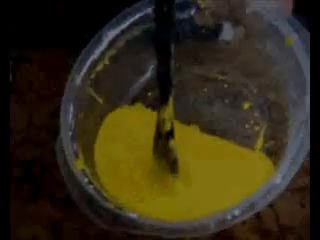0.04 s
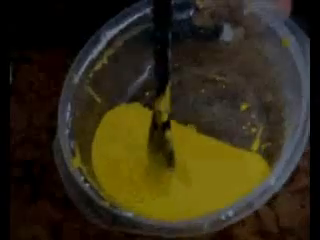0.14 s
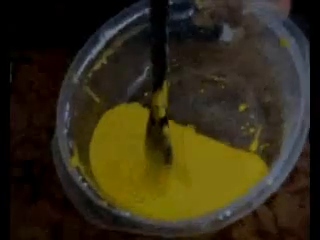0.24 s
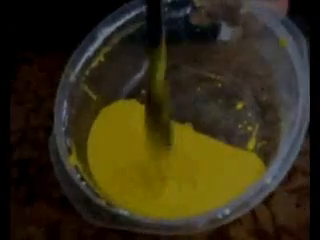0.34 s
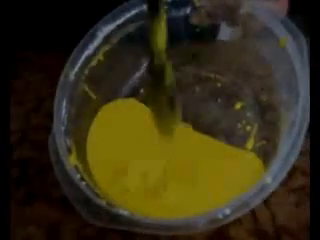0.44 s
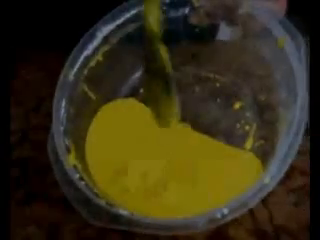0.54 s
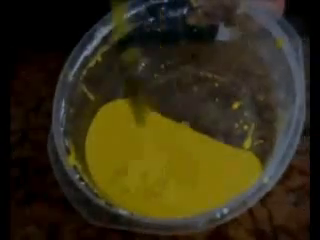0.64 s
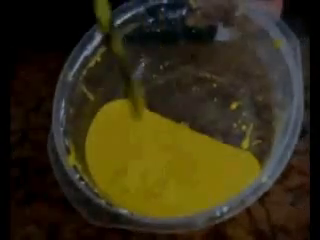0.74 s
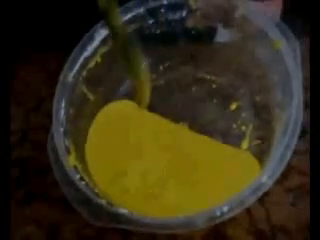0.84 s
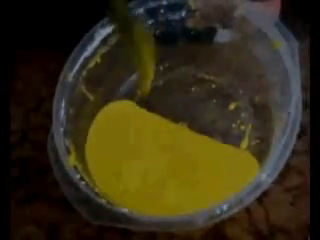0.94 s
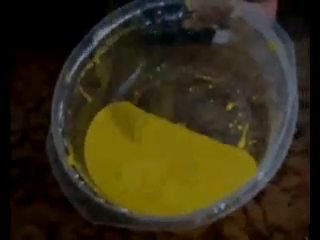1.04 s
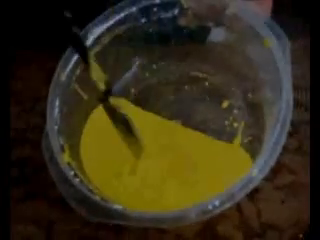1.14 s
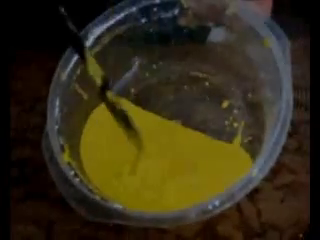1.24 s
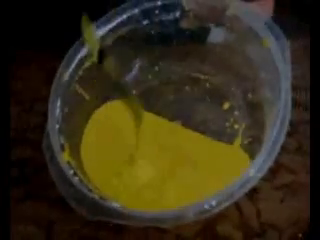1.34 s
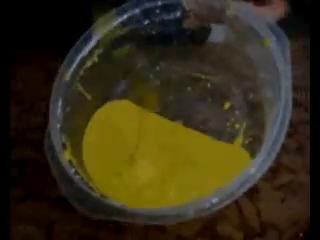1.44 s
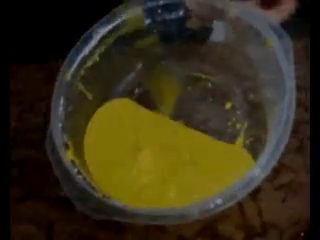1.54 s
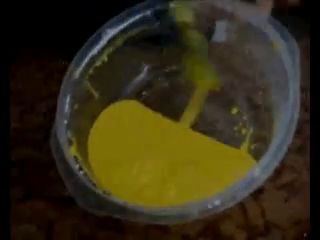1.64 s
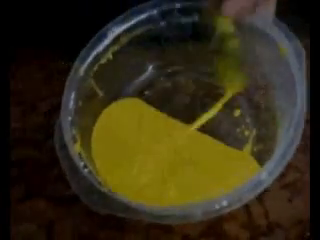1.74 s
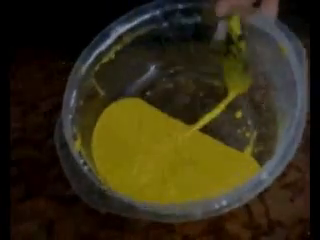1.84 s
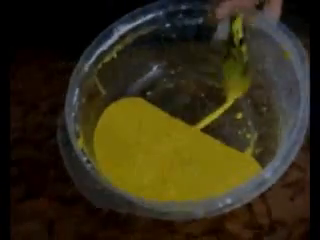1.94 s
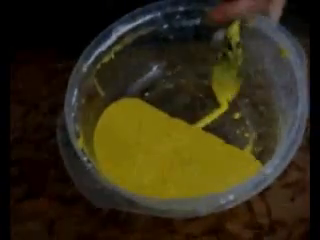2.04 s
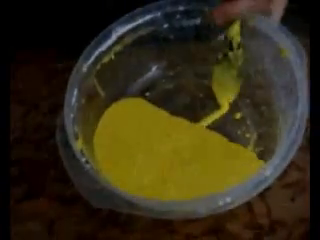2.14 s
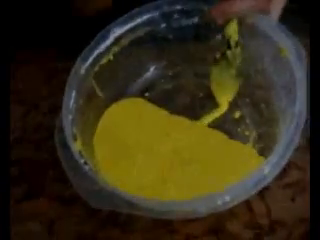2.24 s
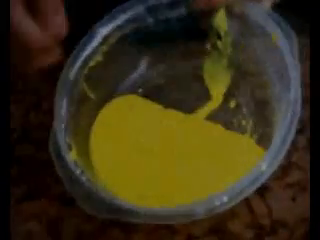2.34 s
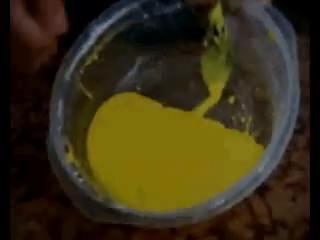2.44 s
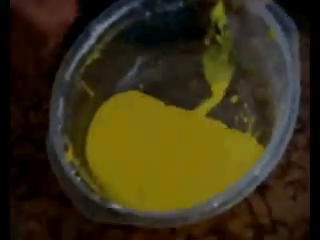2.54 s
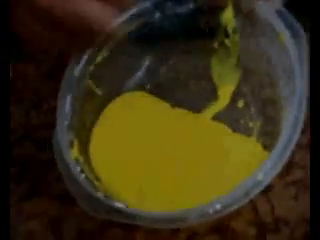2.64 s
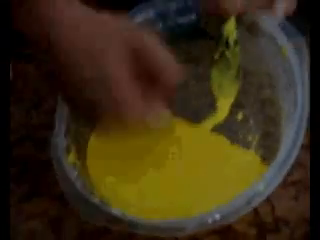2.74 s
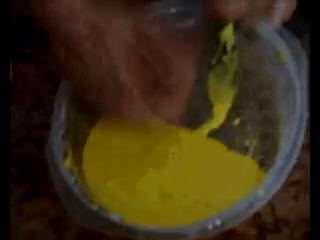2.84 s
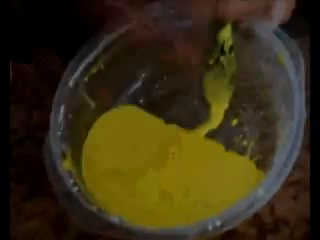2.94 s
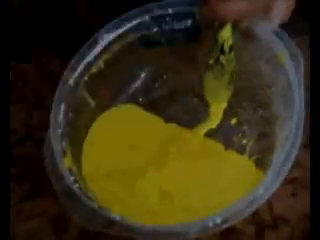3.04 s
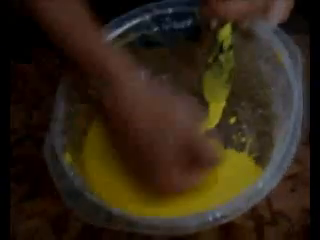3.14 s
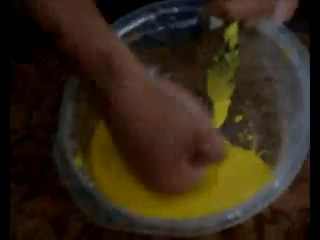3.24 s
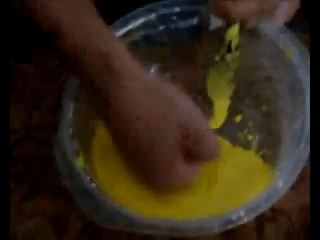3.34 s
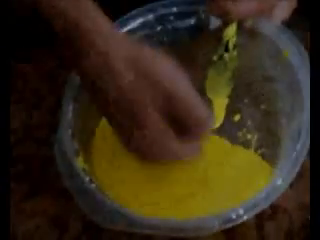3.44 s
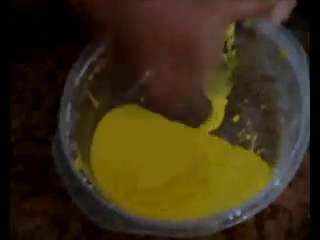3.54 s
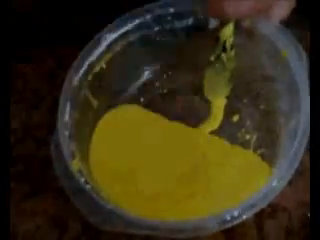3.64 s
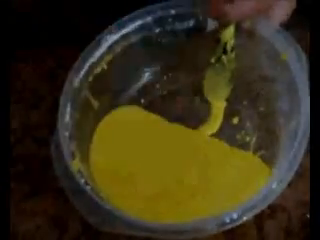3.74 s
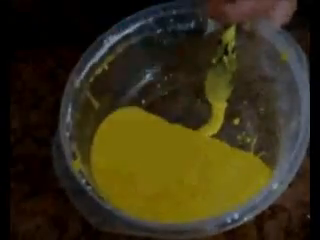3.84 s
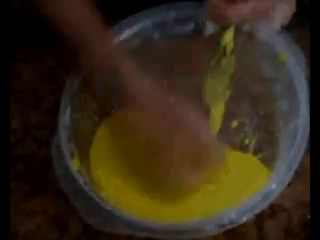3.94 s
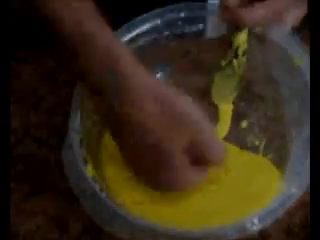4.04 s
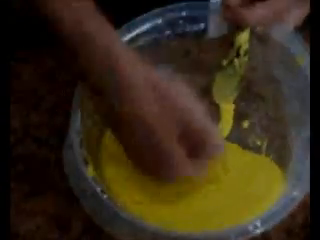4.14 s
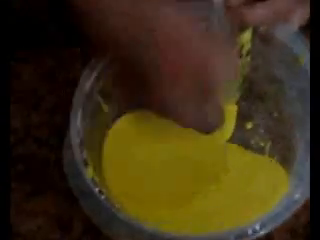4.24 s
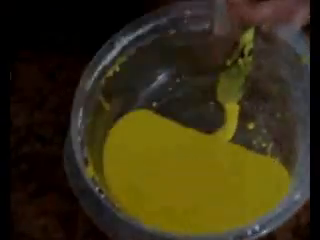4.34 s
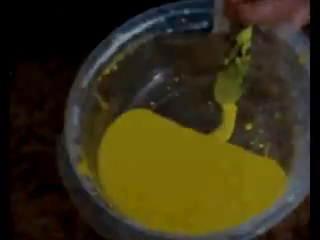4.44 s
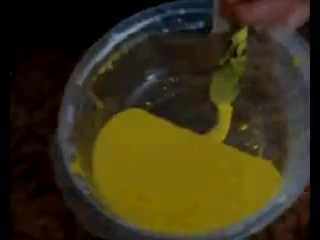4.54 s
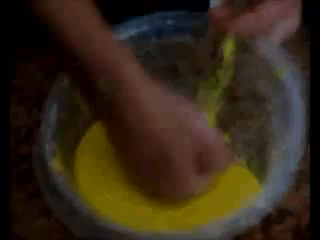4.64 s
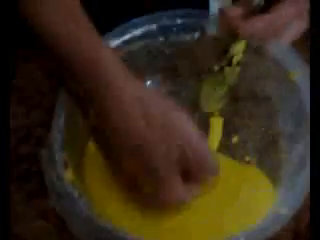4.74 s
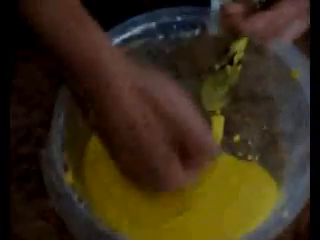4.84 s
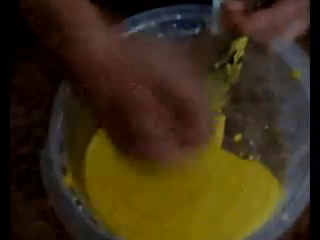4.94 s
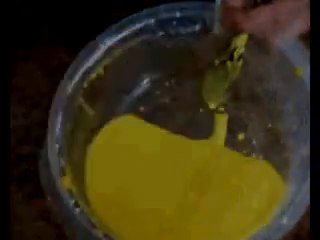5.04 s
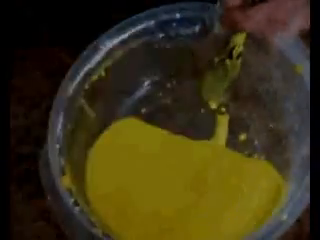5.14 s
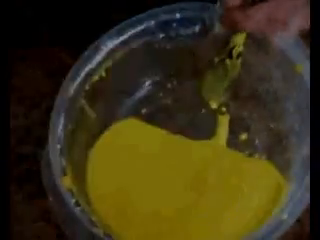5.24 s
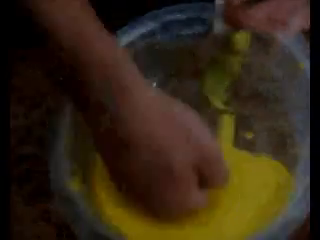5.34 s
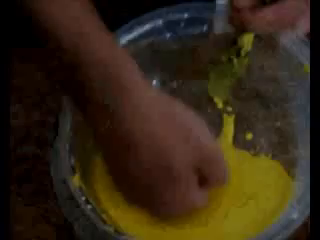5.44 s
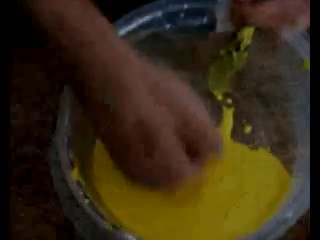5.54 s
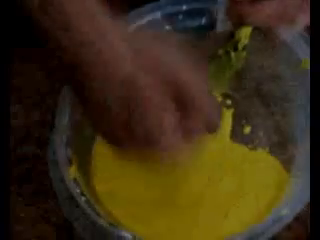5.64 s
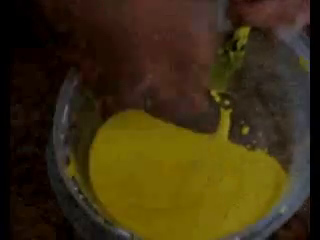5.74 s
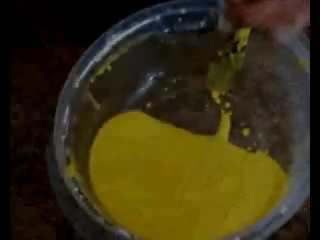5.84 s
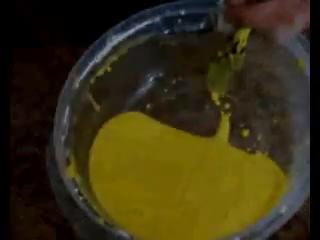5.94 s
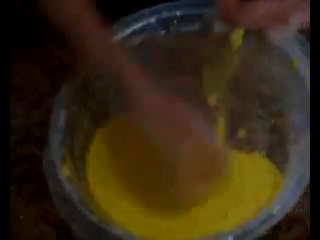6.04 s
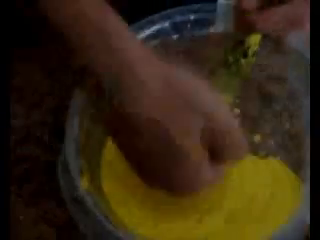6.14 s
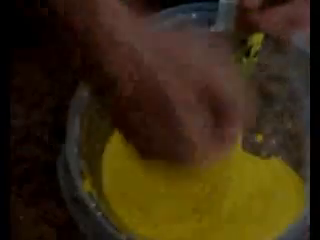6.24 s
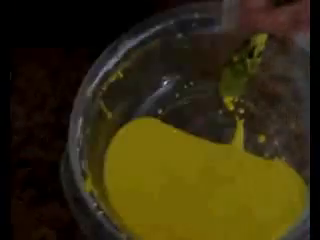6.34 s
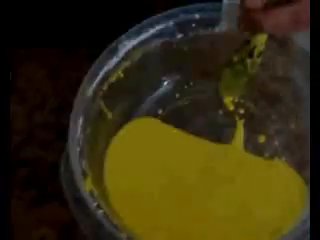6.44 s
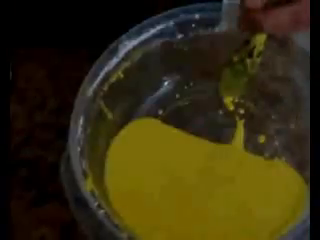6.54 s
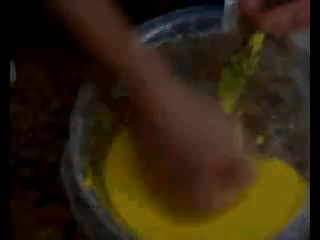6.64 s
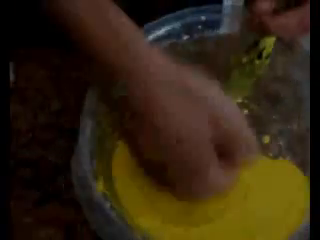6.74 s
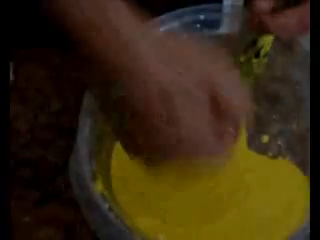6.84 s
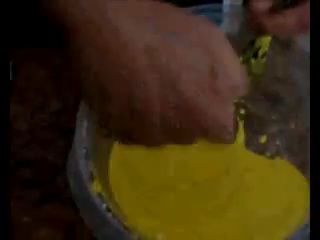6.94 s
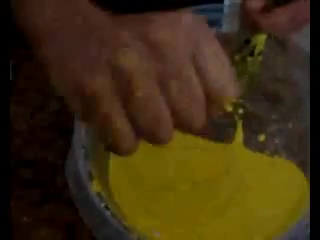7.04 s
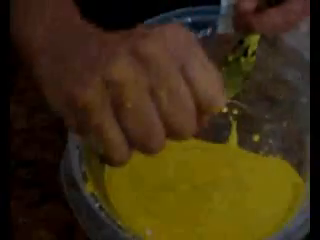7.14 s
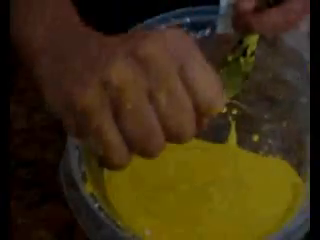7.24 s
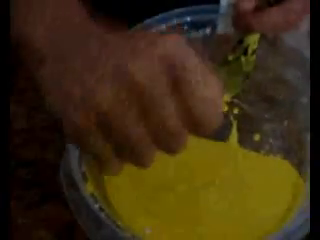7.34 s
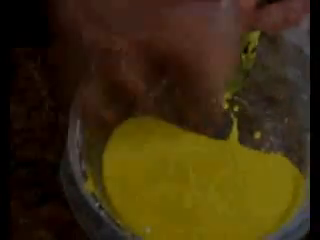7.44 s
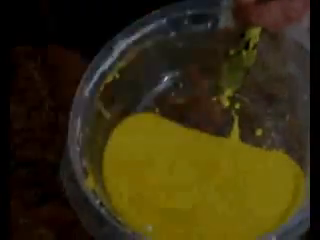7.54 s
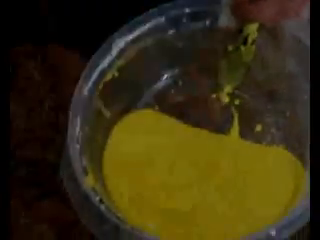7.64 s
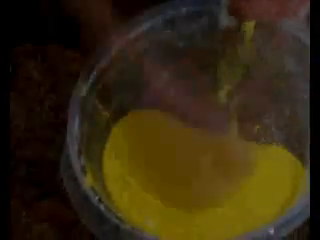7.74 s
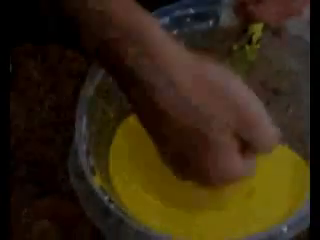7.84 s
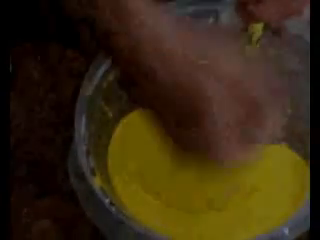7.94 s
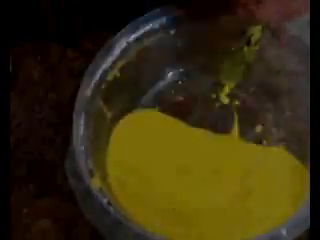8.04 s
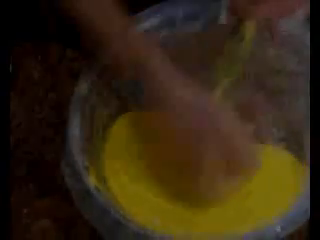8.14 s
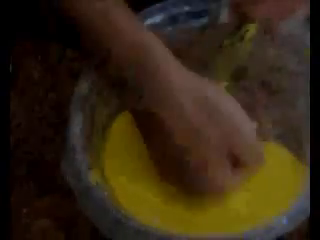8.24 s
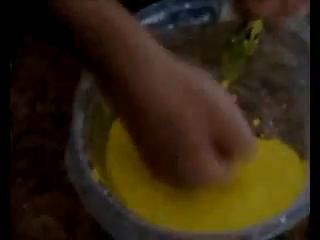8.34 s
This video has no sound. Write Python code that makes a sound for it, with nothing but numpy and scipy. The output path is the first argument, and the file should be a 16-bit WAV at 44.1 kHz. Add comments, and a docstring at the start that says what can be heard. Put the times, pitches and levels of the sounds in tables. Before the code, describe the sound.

Quiet spoon strokes and small clicks on plastic come first, over microphone hiss, low rumble and a faint high whine. Then eight loud punches land on paste that behaves like a solid: crisp slap, dull double knock, brief bowl shudder, low table sway. Metal pieces chatter brightly after each blow, dulling as they settle. Close microphone, small room with a very short faint tail.

```python
"""A spoon swishes, drags and taps in a plastic bowl of cornstarch paste; then a fist punches it eight times.
Heard from just above the bowl on its table, with a faint short tail from nearby walls.
The paste locks solid: each punch is a wet slap of noise, damped-sine knocks and a short judder of the bowl.
The table's low modes sway, and loose metal jangles as thousands of short pings and a few longer modes.
The microphone adds hiss and a thin whine of steady sines."""
import sys
import numpy as np
from scipy import signal
from scipy.fft import rfft, irfft
from scipy.io import wavfile

SR = 44100
rng = np.random.default_rng(int(sys.argv[2]) if len(sys.argv) > 2 else 0)


def inscribe(sig):
    """Save sig as 16-bit PCM at rate SR to the path in sys.argv[1].

    A 1-D sig is mono; a 2-D sig holds one channel per row.
    Samples are clipped to [-1, 1] before scaling.
    """
    pcm = np.round(np.clip(np.atleast_2d(sig).T, -1, 1) * 32767)
    wavfile.write(sys.argv[1], SR, pcm.astype(np.int16))


N = 370440
TIME = np.arange(N) / SR


def from_db(db):
    """Decibels to gain."""
    return 10 ** (np.asarray(db) / 20)


def rms_one(x):
    """Scale to rms 1."""
    return x / np.sqrt(np.mean(x ** 2) + 1e-20)


def add(track, s, sound):
    """Mix a sound into a track at a time in seconds."""
    at = max(round(s * SR), 0)
    track[at:at + len(sound)] += sound[:max(N - at, 0)]


def at_hz(spectrum, hz):
    """Read a (pitch_hz, level_db) spectrum on a log-frequency axis."""
    points, db = np.transpose(spectrum)
    return np.interp(np.log(hz), np.log(points), db)


def coloured(x, spectrum, size=8192):
    """Causal (minimum-phase) filter of unit energy with the given spectrum."""
    grid = np.maximum(np.arange(size // 2 + 1) * SR / size, 1)
    cepstrum = irfft(np.log(from_db(at_hz(spectrum, grid))))
    # fold the cepstrum onto positive times to get minimum phase
    cepstrum[1:size // 2] *= 2
    cepstrum[size // 2 + 1:] = 0
    response = irfft(np.exp(rfft(cepstrum)))
    return signal.fftconvolve(x, response / np.linalg.norm(response))[:N]


def ring(x, hz, t60):
    """A two-pole mode: a unit click sets a decaying sine of height 1 ringing."""
    radius = 10 ** (-3 / (t60 * SR))
    angle = 2 * np.pi * hz / SR
    feedback = [1, -2 * radius * np.cos(angle), radius * radius]
    return signal.lfilter([0, np.sin(angle)], feedback, x + 1e-18)


def resonate(x, hz, t60):
    """A mode that passes white noise at unchanged rms."""
    return ring(x, hz, t60) * np.sqrt(4 * np.log(1000) / (t60 * SR))


def resonate_noise(envelope, hz, t60):
    """White noise shaped by an envelope drives one mode."""
    return resonate(envelope * rng.standard_normal(N), hz, t60)


def band(x, low_hz, high_hz):
    """Gentle band-pass."""
    edges = [low_hz, min(high_hz, SR / 2 - 1)]
    return signal.sosfilt(signal.butter(2, edges, "band", fs=SR, output="sos"), x)


def grains(per_s, spread_db):
    """Random tiny contacts of uneven size and either sign, rms 1."""
    sizes = from_db(spread_db * np.clip(rng.standard_normal(N), -2, 2))
    signs = rng.choice([-1, 1], N)
    return rms_one(sizes * signs * (rng.random(N) < per_s / SR))


def burst(decay_s, size=4096):
    """A puff of noise with exponential decay."""
    return rng.uniform(-1, 1, size) * np.exp(-TIME[:size] / decay_s)


def ping(hz, t60, size=8192):
    """One damped sine."""
    return np.sin(2 * np.pi * hz * TIME[:size]) * np.exp(-np.log(1000) * TIME[:size] / t60)


# Hiss and rumble at the microphone: pitch_hz, level_db (per Hz, relative)
HISS_COLOUR = [(20, -3.5), (55, -8), (75, -2.5), (110, -12.5), (220, -13), (480, -22), (900, -24),
               (2200, -26), (4500, -27.5), (7000, -31), (8500, -41), (9300, -49), (10000, -69)]
# Faint resonances behind the hiss: pitch_hz, level_db (rms), t60_s
HOLLOWS = [(25.9, -51, .4), (48.4, -55, 0.35), (650, -59.5, 0.01), (1920, -63.5, 0.043), (3360, -71, .03)]
# Thin steady whine: pitch_hz, level_db (rms)
WHINE = [(7014, -61.5), (7289, -68), (7359, -71), (8646, -85.5), (8710, -78), (8990, -78)]
HISS_DB = -46.5   # rms


def background():
    """Filtered noise makes rumble and hiss, narrow modes colour it, and steady sines make the electronic whine."""
    hiss = from_db(HISS_DB) * coloured(rng.standard_normal(N), HISS_COLOUR)
    hollow = sum(from_db(db) * resonate_noise(1, hz, t60) for hz, db, t60 in HOLLOWS)
    whine = sum(from_db(db) * np.sqrt(2) * np.sin(2 * np.pi * hz * TIME) for hz, db in WHINE)
    return hiss + hollow + whine


# Soft swishes, three spoon strokes and then the arm coming in: start_s, level_db
SWISHES = [(.16, -56.5), (.53, -56), (.87, -55), (2.7, -58)]
# Spoon dragging on the bowl: start_s, length_s, level_db
SCRAPES = [(.55, .3, -59), (.85, .48, -56), (1.41, .12, -54), (1.55, .09, -48), (1.68, .13, -53)]
# What the dragged spoon sounds: pitch_hz, level_db (relative), t60_s
SCRAPE_MODES = [(640, -8, 0.033), (1310, -18, 0.0055), (2000, -6, 0.013), (2730, -12, 0.0067),
                (3510, -2.5, 0.016)]
SWISH_S, SWISH_START_HZ, SWISH_END_HZ = .33, 5700, 3400


def spoon(swish_width_hz=580):
    """Swishes are a falling tone roughened by noise; drags are grains of contact ringing a few modes."""
    swishes, drag = np.zeros((2, N))
    stroke = np.clip(TIME[:SR] / SWISH_S, 0, 1)
    glide_hz = SWISH_START_HZ + (SWISH_END_HZ - SWISH_START_HZ) * stroke
    glide = np.sin(2 * np.pi * np.cumsum(glide_hz) / SR)
    swell = np.sin(np.pi * stroke)
    for s, db in SWISHES:
        friction = rms_one(band(rng.standard_normal(SR), low_hz=10, high_hz=swish_width_hz))
        add(swishes, s, from_db(db) * np.sqrt(2) * swell * glide * friction)
    for s, length, db in SCRAPES:
        add(drag, s, from_db(db) * np.sin(np.pi * np.clip(TIME[:SR] / length, 0, 1)))
    drag *= grains(per_s=2500, spread_db=3)
    return swishes + sum(from_db(db) * resonate(drag, hz, t60) for hz, db, t60 in SCRAPE_MODES)


# Small taps of spoon and fingers on the bowl: start_s, level_db (relative), pitch_hz, ring_cycles (to -60 dB)
TAPS = [(.385, -23, 5460, 5), (1.44, -12.5, 2780, 16), (1.460, -26, 2700, 11), (1.598, -25, 637, 43),
        (1.600, -18, 3000, 3), (1.844, -16.5, 4300, 4.2), (1.880, -17, 210, 4.3), (1.881, -22, 650, 8.6),
        (1.927, -25, 180, 4), (4.595, -3.5, 2620, 3.7), (5.127, -9, 5000, 6), (5.158, -17, 3740, 30),
        (5.932, -12, 4750, 22), (6.021, -14.5, 3540, 34)]


def taps():
    """Each light tap is a damped sine and a puff of noise around its pitch."""
    out = np.zeros(N)
    for s, db, hz, cycles in TAPS:
        add(out, s, from_db(db - 7.5) * ping(hz, t60=cycles / hz))
        puff = band(burst(decay_s=0.0043), low_hz=hz * 0.27, high_hz=hz * 1.42)
        add(out, s, from_db(db - 11.0) * puff)
    return out


# Fist meets paste, also played by bowl() and table() below; levels are relative within each layer:
# start_s, slap_db, knock_db, judder_db, judder_pitch_hz, judder_length_s, thud_db, table_sway_db
PUNCHES = [(3.1875, -6, -7.5, -25, 530, 0.13, -26.5, -15),
           (3.9551, -1, -11, -19.5, 506, 0.088, -23.5, -13.5),
           (4.6621, -6, -6.5, -18, 635, 0.086, -23.5, -15), (5.356, -8.5, -8, -22.5, 340, 0.08, -27, -13),
           (6.0903, -3, -6, -21.5, 496, 0.061, -25, -13.5),
           (6.678, -1, -8.5, -23, 413, 0.0944, -28.5, -16.5),
           (7.773, -0.5, -9, -21.5, 511, 0.096, -34, -14.5), (8.2245, -1, -7.5, -21, 545, 0.11, -39, -21.5)]


def slaps():
    """Skin meets the wet surface and squeezes out the air in a few milliseconds."""
    out = np.zeros(N)
    onset = np.clip(TIME[:4096] / 0.002, 0, 1)
    for s, db, *_ in PUNCHES:
        add(out, s, from_db(db + 5.5) * burst(decay_s=0.0025) * onset)
    return band(out, low_hz=2660, high_hz=6300)


# A low push and two knocks per punch, through the locked paste and as the bowl hits the table:
# delay_s, level_db, pitch_hz, crack_db (both levels added to the punch's knock_db)
LANDING = [(.0008, -8.5, 67, -19), (.0022, -2, 402, -5.5), (.0055, -1, 510, -7.5)]
# The bowl rebounds and knocks on the table again: start_s, level_db, pitch_hz, crack_db (levels relative)
REBOUNDS = [(3.2215, -11, 650, -20), (3.279, -7.5, 920, -4.5), (3.973, -7, 654, -9.5),
            (4.0487, -10.5, 841, -7), (6.1115, -11.5, 636, -18), (6.187, -9.5, 680, -13),
            (6.7001, -6, 485, -14.5), (7.7938, 1, 483, -17), (8.2477, -4, 604, -8)]
# Rough colour of the judder: pitch_hz, level_db (per Hz, relative)
JUDDER_COLOUR = [(100, -21), (250, 5), (650, -11), (900, -4.5), (1200, -3), (1600, -10.5), (3000, -12.5),
                 (5600, -18), (8000, -24.5), (9500, -56)]
# The loaded bowl: pitch_hz, level_db (relative), t60_s
BOWL_MODES = [(261, -1, 0.07), (306, -4.5, 0.064), (388.7, -1.5, 0.11), (487, -4, 0.05), (577, -5.5, .08),
              (650.4, -1.5, 0.07), (693, 1, 0.07)]
# The fist's push on the bowl
PRESS_ATTACK_S, PRESS_RELEASE_S, PRESS_SAG_DB_PER_S = 0.0013, .0054, 34.5


def bowl(focus_db=7):
    """Hard knocks, then a judder for as long as the fist drives the bowl against the table."""
    thumps, cracks, press, thud = np.zeros((4, N))
    landings = [(s + delay, knock_db + db, hz, knock_db + crack_db)
                for s, _, knock_db, *_ in PUNCHES for delay, db, hz, crack_db in LANDING]
    for s, db, hz, crack_db in landings + REBOUNDS:
        add(thumps, s, -from_db(db + 4.0) * ping(hz, t60=5.8 / hz))
        add(cracks, s, from_db(crack_db + 11) * burst(decay_s=.0025))
    pitch, age = np.full(N, 500.), TIME[:SR // 4]
    for s, _, _, db, hz, length, thud_db, _ in PUNCHES:
        attack = np.clip(age / PRESS_ATTACK_S, 0, 1)
        release = np.clip((length - age) / PRESS_RELEASE_S + .5, 0, 1)
        contact = from_db(-PRESS_SAG_DB_PER_S * age) * attack * release
        add(press, s, from_db(db) * contact)
        add(thud, s, from_db(thud_db) * contact)
        pitch[round(s * SR):] = hz
    judder = press * grains(per_s=3900, spread_db=4.5)
    wall = np.zeros(N)
    for hz, db, t60 in BOWL_MODES:
        # where the fist lands decides which modes speak most
        octaves_away = np.abs(np.log2(hz / pitch))
        wall += from_db(db - 2.5 - focus_db * octaves_away) * resonate_noise(press, hz, t60)
    thud_modes = [(73.0, 1, 0.036), (128.2, 4.5, 0.051), (207.0, -3.5, .05)]   # pitch_hz, level_db, t60_s
    weight = sum(from_db(db) * resonate_noise(thud, hz, t60) for hz, db, t60 in thud_modes)
    knocks = thumps + band(cracks, low_hz=920, high_hz=2870)
    return knocks + from_db(-6) * coloured(judder, JUDDER_COLOUR) + wall + weight


# The table under the bowl: pitch_hz, level_db (relative), t60_s
TABLE_MODES = [(26.66, -1, 1.63), (34.6, 0, 0.11), (54.4, -8.5, 1.1), (76.5, -8, 0.55), (131, -13.5, 1.1)]


def table():
    """Each punch is one impulse that leaves the table swaying in its lowest modes."""
    shoves = np.zeros(N)
    for s, *_, db in PUNCHES:
        add(shoves, s, from_db([db]))
    return sum(from_db(db) * ring(shoves, hz, t60) for hz, db, t60 in TABLE_MODES)


# Loose metal on the table after each punch, also played by clinks() below:
# first_stir_s, breaks_loose_s, strength_db (relative), hold_s, release_db_per_s
JANGLES = [(3.287, 3.318, -20, .11, 101), (4.035, 4.056, -18, 0.17, 92), (4.721, 4.762, -17.5, 0.23, 73),
           (5.408, 5.419, -18, 0.33, 57), (6.14, 6.152, -19, .24, 86), (6.723, 6.771, -19, 0.32, 102.5),
           (7.828, 7.871, -19, .15, 81), (8.282, 8.325, -19.5, .2, 80)]
# The lighter rattle before the pieces break loose; its level is relative to strength_db
STIR_DB, STIR_RISE_S, STIR_HARDNESS_DB = -6.5, 0.0027, 2
# Contacts start hard and soften as the sway dies
HARDNESS_DB, SOFTENING_DB_PER_S, SOFTEST_DB = 8, 44, -15


def shaking():
    """Gain and contact hardness (dB) of the metal: it stirs, breaks loose, holds while softening, dies away."""
    shake, hard_db = np.zeros((2, N))
    for stir_s, loose_s, db, hold_s, release in JANGLES:
        at = round(stir_s * SR)
        age = TIME[at:] - loose_s
        stirring = age < 0
        fall_db = release * np.maximum(age - hold_s, 0)
        rise = np.clip(TIME[:N - at] / STIR_RISE_S, 0, 1)
        shake[at:] = from_db(db + np.where(stirring, STIR_DB, -fall_db)) * rise
        softening = np.maximum(HARDNESS_DB - SOFTENING_DB_PER_S * age, SOFTEST_DB)
        hard_db[at:] = np.where(stirring, STIR_HARDNESS_DB, softening)
    return shake, hard_db


# Colour of the metal's tiny collisions: pitch_hz, level_db (relative)
JANGLE_COLOUR = [(700, -25.5), (900, -19), (1350, -11), (1850, -9.5), (2300, -18.5), (2750, -11.5),
                 (3500, -2), (3900, -11), (4350, -8.5), (4600, -15.5), (5200, -20.5), (6450, -13),
                 (7200, -12), (8000, -25), (9600, -25.5)]
# Longer-ringing modes of the metal: pitch_hz, level_db (relative)
METAL_MODES = [(1599, -49), (1717, -49), (1814, -39.5), (2622, -46), (2810, -47), (3494, -42.5),
               (3736, -39), (4048, -39), (4344, -43.5), (5739, -44.5), (6406, -47), (6627, -48.5),
               (6778, -50), (7122, -47.5)]
JANGLE_MODE_DB = 22.5   # added to every metal mode
SURGE_DB, SURGE_HZ = 1.0, 35   # depth (rms) and upper rate of the uneven chatter
MODE_HARDNESS_FLOOR = 0.05   # the low modes follow the hardness by at least this share


def jangle(shake, hard_db, sway_hz=27, sway_db=0.53, piece_t60=0.034, mode_t60=0.15, count=34000):
    """Metal chatters at about the sway's rate; softer contacts sink the sound from treble to low modes."""
    surges = rms_one(band(rng.standard_normal(N), low_hz=10.5, high_hz=SURGE_HZ))
    shake = shake * from_db(sway_db * np.sin(2 * np.pi * sway_hz * TIME) + SURGE_DB * surges)
    # pitch_hz, share of the hardness
    follows = [(1700, -0.31), (3500, 0.32), (4500, 0.41), (6500, 0.9)]
    # each tiny collision rings briefly at a pitch of its own
    when, where, force = rng.random((count, 3)).T
    at, pitch = (when * N).astype(int), 700 + 8900 * where
    level_db = at_hz(JANGLE_COLOUR, pitch) + at_hz(follows, pitch) * hard_db[at] + 0.43 * force
    gains = shake[at] * from_db(level_db)
    out = np.zeros(N)
    for k in np.flatnonzero(gains):
        add(out, at[k] / SR, gains[k] * ping(pitch[k], piece_t60, size=1000))
    # the collisions keep a few long modes singing
    for hz, db in METAL_MODES:
        drive = shake * from_db(max(at_hz(follows, hz), MODE_HARDNESS_FLOOR) * hard_db)
        out += from_db(db + JANGLE_MODE_DB) * resonate_noise(drive, hz, mode_t60)
    # and buzz through the table top
    buzz = rms_one(band(grains(per_s=1500, spread_db=4.0), low_hz=148.0, high_hz=1240))
    return out + from_db(-16.5) * shake * buzz


# Single louder clinks in the jangle: start_s, level_db (relative)
CLINKS = [(3.357, -1.5), (4.0944, -1), (4.8055, -14), (4.9694, -4), (5.4994, -2), (5.772, -6.5),
          (8.3677, -3)]
CLINK_DECAY_S = .005
STIR_CLINK_DB, LOOSE_CLINK_DB = 8, 13.5   # pieces landing together, above the jangle's strength
STRAY_CLINKS_PER_S, STRAY_CLINK_DB = 15, 2.5   # chance clinks, above the strength of the moment


def clinks(shake):
    """Several pieces land almost together, as noise bursts, and sound their two main resonances."""
    landings = np.zeros(N)
    for stir_s, loose_s, db, *_ in JANGLES:
        add(landings, stir_s, from_db(db + STIR_CLINK_DB) * burst(CLINK_DECAY_S))
        add(landings, loose_s, from_db(db + LOOSE_CLINK_DB) * burst(CLINK_DECAY_S))
    for s, db in CLINKS:
        add(landings, s, from_db(db) * burst(CLINK_DECAY_S))
    strays = (rng.random(N) < STRAY_CLINKS_PER_S / SR) * shake * from_db(STRAY_CLINK_DB)
    landings += signal.fftconvolve(strays, burst(CLINK_DECAY_S))[:N]
    low = from_db(-5.0) * resonate(landings, hz=3510, t60=0.016)
    high = from_db(-17.5) * resonate(landings, hz=6300, t60=0.0082)
    return low + high


# The bowl shifts as the fist pulls free: start_s, length_s, level_db (relative)
PULLS = [(4.446, 0.25, -34.5), (5.118, 0.27, -36.5), (5.826, 0.34, -40)]
# Colour of the rub: pitch_hz, level_db (per Hz, relative)
PULL_COLOUR = [(29, -37), (50, -3), (102, -5), (219, -3), (340, -25), (448, -21), (496, -19), (1000, -15),
               (1300, -39), (2200, -120)]
# The shifting bowl hums: pitch_hz, level_db (relative), t60_s
PULL_MODES = [(216, -2, .14), (290, -11, .1), (383, -16.5, 0.18), (427, -10, .18)]
PULL_RISE_S, PULL_SAG_DB_PER_S, PULL_FALL_S = 0.02, 41, 0.015


def pulls():
    """The paste clings to the rising fist, so the bowl rubs low on the table in small slips."""
    drag, age = np.zeros(N), TIME[:SR // 2]
    for s, length, db in PULLS:
        rise = np.clip(age / PULL_RISE_S, 0, 1)
        fall = np.clip((length - age) / PULL_FALL_S + 1, 0, 1)
        add(drag, s, from_db(db - PULL_SAG_DB_PER_S * age) * rise * fall)
    slips = drag * grains(per_s=550, spread_db=0.5)
    hum = sum(from_db(db) * resonate(slips, hz, t60) for hz, db, t60 in PULL_MODES)
    return coloured(slips, PULL_COLOUR) + hum


def room(x, t60=0.38, wet_db=-17):
    """A faint, short tail of decaying noise from nearby walls."""
    age = TIME[:SR // 2]
    tail = band(rng.standard_normal(len(age)), low_hz=200, high_hz=5500)
    tail = tail * from_db(-60 * age / t60) * (age > .005)
    return x + from_db(wet_db) * signal.fftconvolve(x, tail / np.linalg.norm(tail))[:N]


def scene():
    """Everything as heard just above the bowl; the table and background get no room tail."""
    shake, hard_db = shaking()
    near = spoon() + taps() + slaps() + bowl() + jangle(shake, hard_db) + clinks(shake) + pulls()
    return (room(near) + table() + background())[None]


BANDWIDTH_HZ, CUTOFF_HZ = 10300, 15800   # stop-band edges
MIRROR_DB, MIRROR_TOP_HZ = -19, 13200   # half-rate sampling leaks a faint mirror image of the treble


def record(dry):
    """The microphone chain rounds loud peaks, narrows the band, leaks a treble mirror and cuts the top."""
    rounded = dry / (1 + (dry / .95) ** 6) ** (1 / 6)
    narrow = signal.sosfilt(signal.cheby2(12, 60, BANDWIDTH_HZ, fs=SR, output="sos"), rounded)
    flipped = narrow * (-1) ** np.arange(N)   # turns the spectrum upside down
    mirror = signal.sosfilt(signal.butter(12, MIRROR_TOP_HZ, fs=SR, output="sos"), flipped)
    mixed = narrow + from_db(MIRROR_DB) * mirror
    return signal.sosfilt(signal.cheby2(12, 60, CUTOFF_HZ, fs=SR, output="sos"), mixed)


dry = scene()
out = record(dry)
inscribe(out)
```